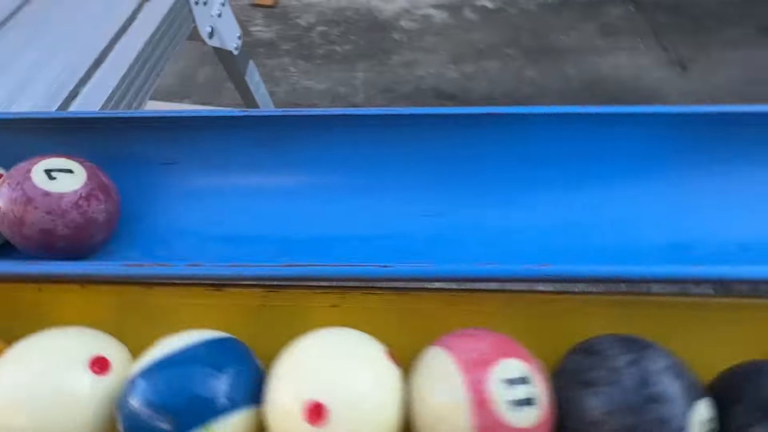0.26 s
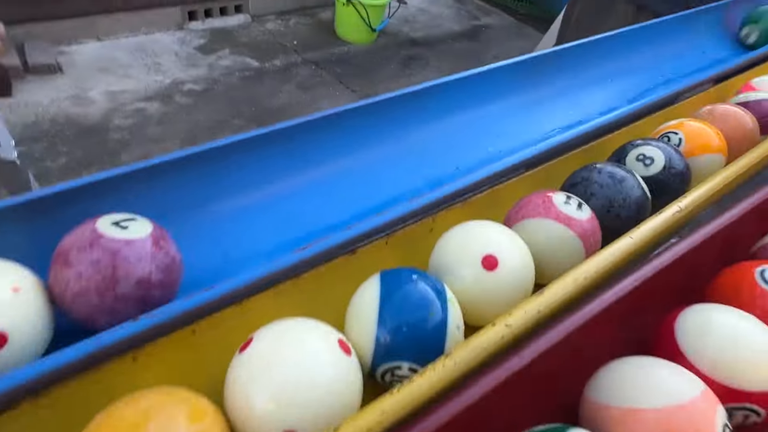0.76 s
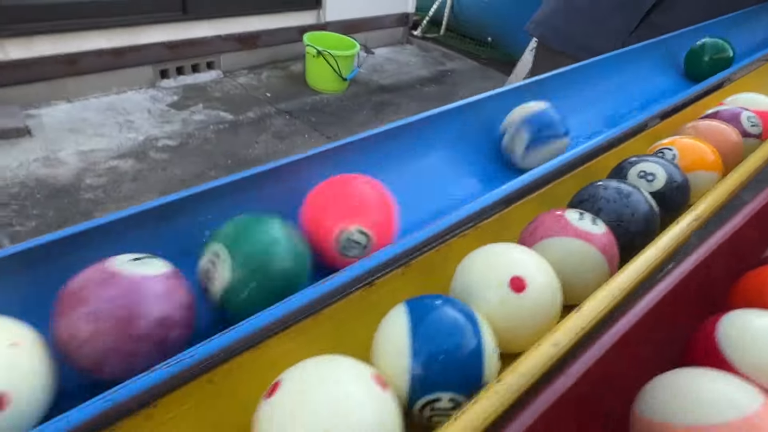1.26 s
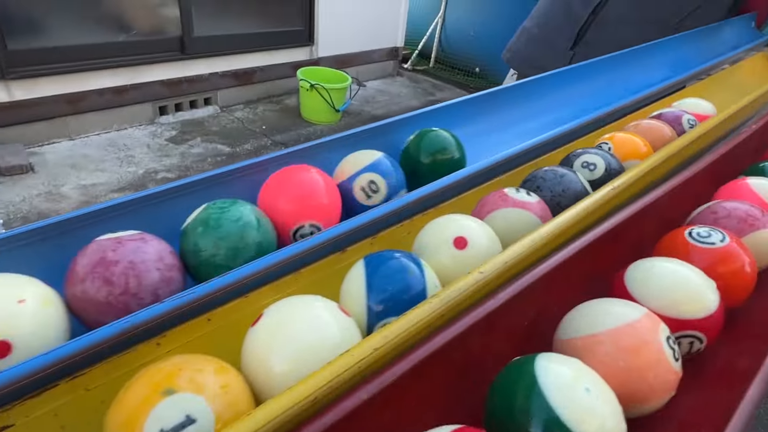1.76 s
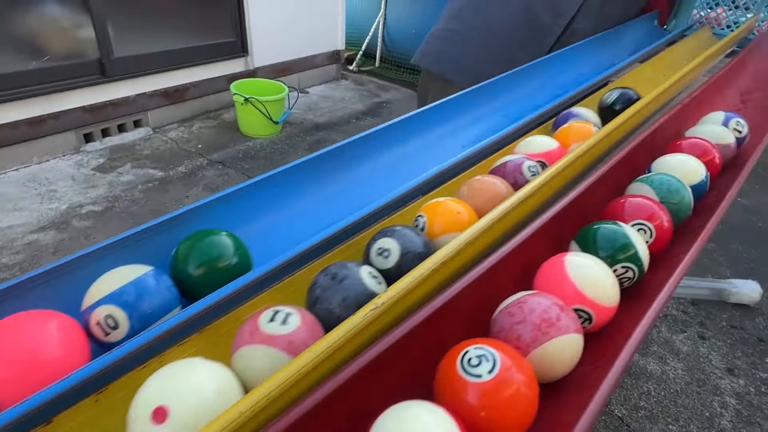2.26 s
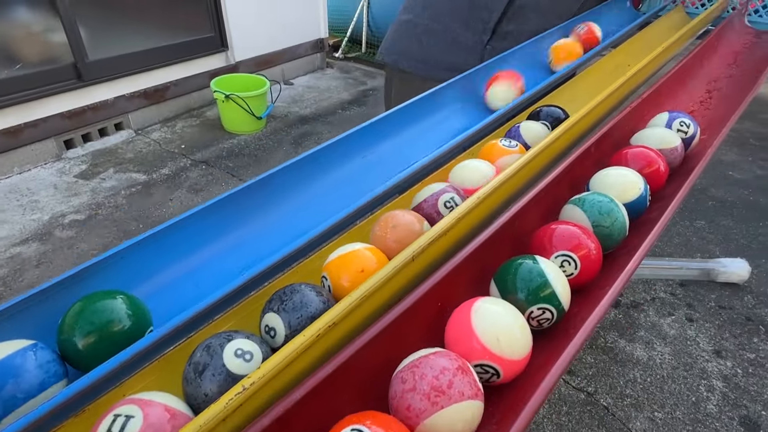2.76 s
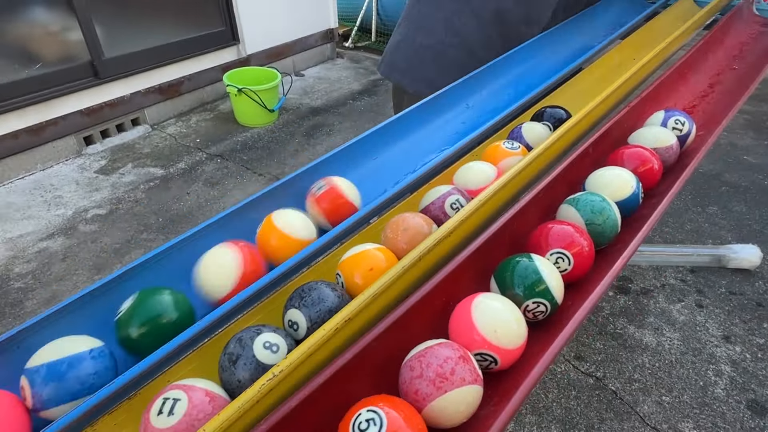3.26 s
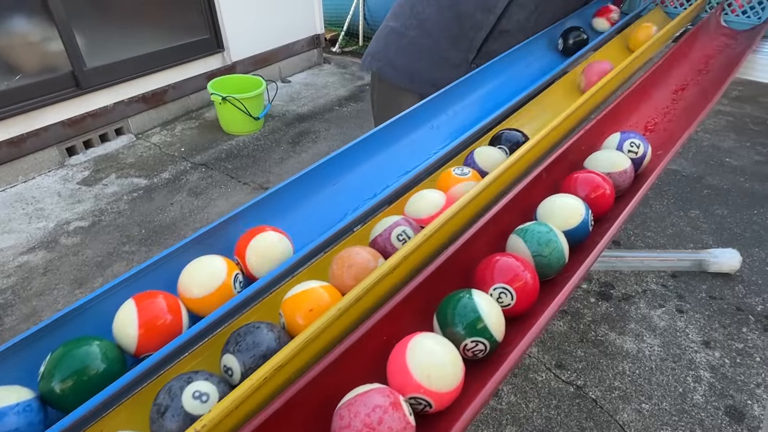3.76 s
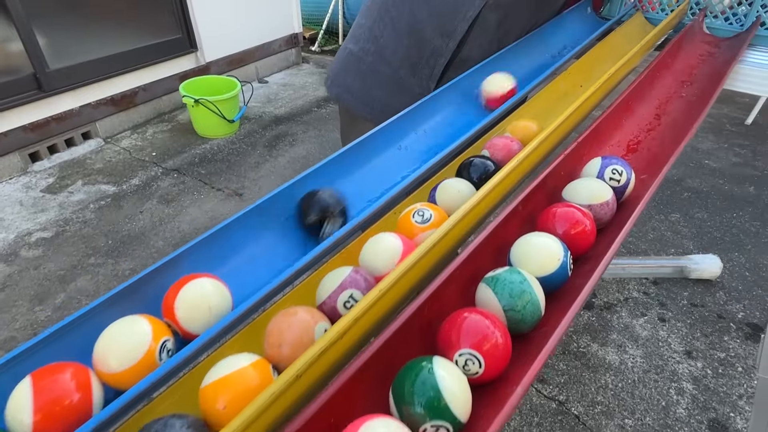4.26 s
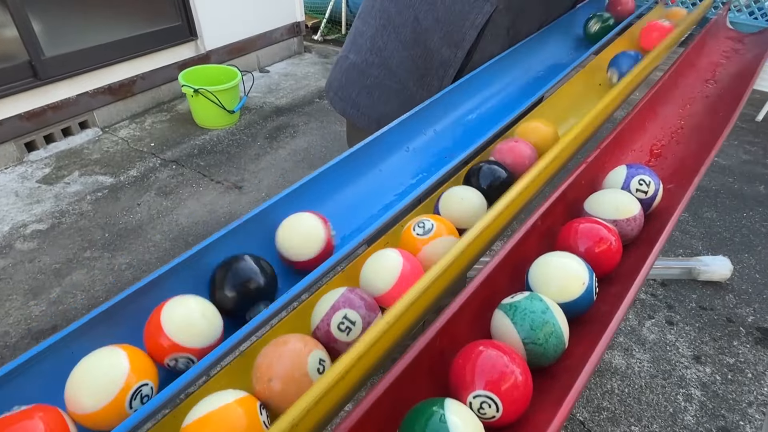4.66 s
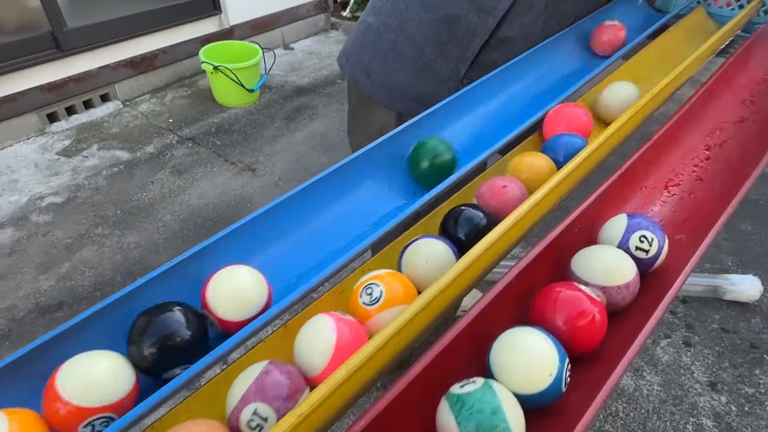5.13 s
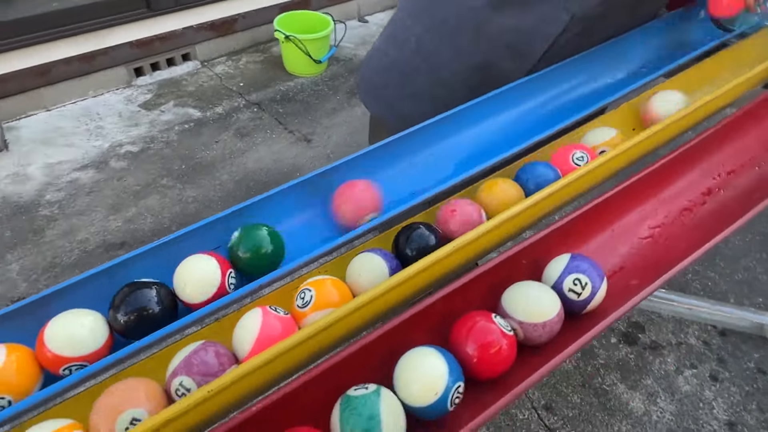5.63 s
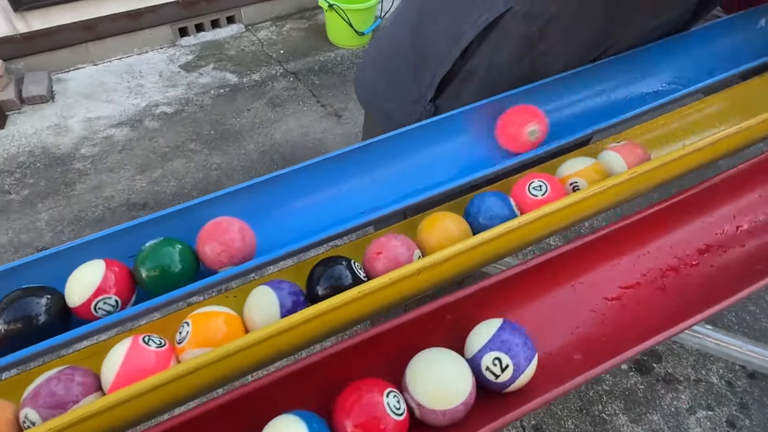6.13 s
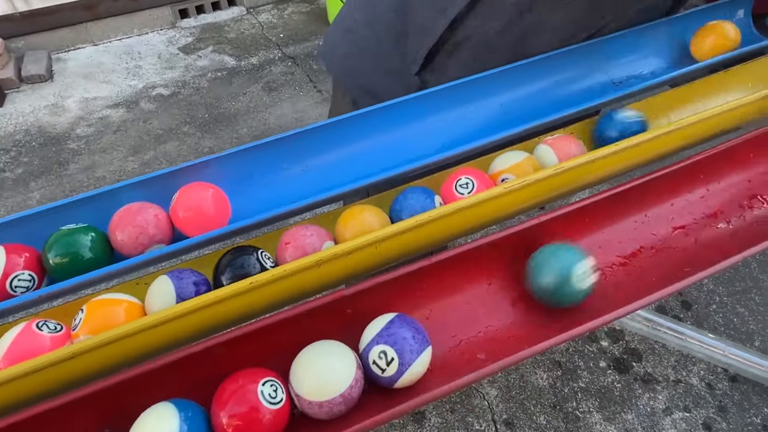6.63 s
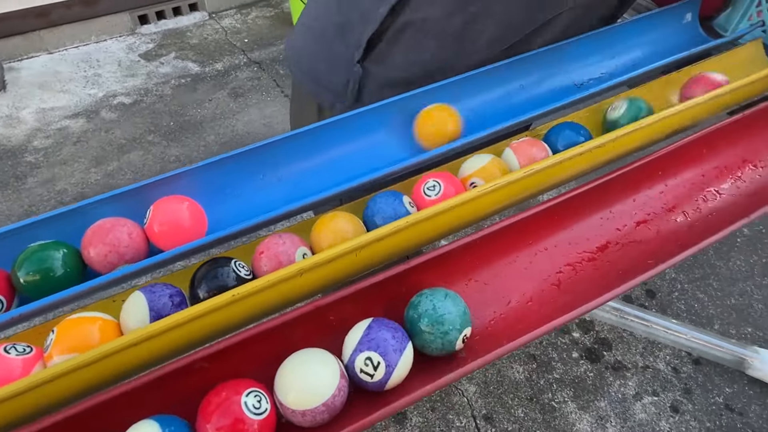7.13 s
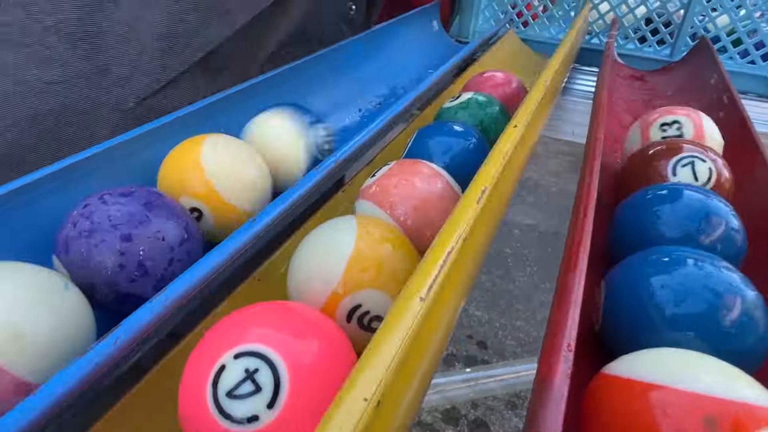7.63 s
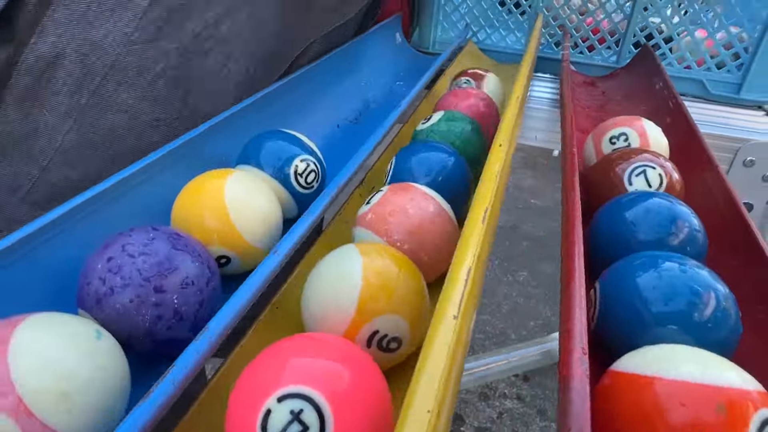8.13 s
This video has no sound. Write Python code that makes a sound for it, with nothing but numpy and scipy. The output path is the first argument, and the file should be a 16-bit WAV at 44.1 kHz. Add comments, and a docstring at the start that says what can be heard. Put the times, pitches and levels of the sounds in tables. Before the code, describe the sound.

Hard billiard balls tumble into plastic gutters, rumbling down the slope and clacking sharply against queued balls, close up in an open yard.

```python
"""A walled yard: billiard balls are tipped one after another into plastic rain gutters, heard close.
Balls land with a hollow knock, rumble down the slope and clack into the queue at the bottom.
Filtered noise gives the knocks and the rolling; short gliding sine packets with a snap give the clacks.
The yard answers the clacks with a noise tail, over faint outdoor air.
The recorder's limiter catches the loudest clacks and ducks everything briefly after them."""
import sys
import numpy as np
from scipy import signal
from scipy.fft import rfft, irfft, next_fast_len
from scipy.io import wavfile
from scipy.ndimage import uniform_filter1d, minimum_filter1d, map_coordinates

SR = 44100
rng = np.random.default_rng(int(sys.argv[2]) if len(sys.argv) > 2 else 0)


def output_pcm(signal):
    """Save a mono or channel-first signal as 16-bit PCM at the path in sys.argv[1].

    Samples are clipped to [-1, 1] before scaling.
    """
    pcm = np.clip(np.atleast_2d(signal).T, -1, 1) * 32767
    wavfile.write(sys.argv[1], SR, np.round(pcm).astype(np.int16))


N = 369999

# Ball meets ball, levels before the limiter: (t/s, ring level/dB, ring f/Hz, snap level/dB re the ring
# before a common trim, ring half-width/ms before shaping, snap treble/dB, applied in part)
CLACK_EVENTS = [(0.041, -27, 3850, -8, 0.82, -2), (0.0799, -5, 5160, 0.5, 0.27, 1),
                (0.0818, -0.5, 3430, -7, 0.43, -7), (0.129, -18.5, 3840, 1, 0.44, -3),
                (0.147, -26, 3600, -8, .8, -2), (0.243, -21, 3600, 1, 1.5, 0),
                (0.2778, -19.5, 4040, 4.5, 0.54, 0), (0.359, -9, 4020, -6, 0.66, 3),
                (0.3615, 4, 3270, -2.5, 0.34, 15), (0.371, -5, 4260, 2, 0.66, 0),
                (0.447, -15.5, 4280, 9.5, 0.68, -2), (0.7885, 0.5, 3800, 1.5, 0.5, 7),
                (1.329, -3, 4100, 1.5, 0.45, 3), (1.3403, -5, 3800, 2, 0.42, 6),
                (1.3448, -5, 4040, -4, .42, 2), (1.3487, -2.5, 3930, 1, 0.44, 7),
                (1.352, -5, 3870, -4, .6, 0), (1.3988, -6, 3500, -5, 0.5, 0),
                (1.4139, -4, 3555, -5, 0.5, 11), (1.4246, -8.5, 3600, -7, .6, 5),
                (1.438, -4.5, 3930, 2, 0.36, -6), (1.4614, -21, 3644, -1, .7, 0),
                (1.512, -24, 3730, -9, .7, -2), (1.5385, -20.5, 3820, -7, .6, -10),
                (1.551, -27, 3950, -9, .7, -2), (1.636, -26, 3900, 4, 1.0, -6),
                (1.686, -13, 3820, 0, 0.51, 0), (1.689, -14, 4100, -8, 0.51, -3),
                (1.6921, -6, 3880, -1.5, .6, -2), (1.696, -16, 4000, -5, .5, -3),
                (1.703, -16.5, 4100, -1, 0.8, -2), (1.8985, -13, 3030, -1, 0.42, 0),
                (1.9007, -4.5, 3950, 2.5, 0.7, -3), (1.965, -28.5, 3850, -13, 0.52, 0),
                (2.01, -22.5, 2960, -5, 0.4, 1), (2.1477, -23.5, 3900, -0.5, 0.43, 1),
                (2.314, 2.5, 3860, -3.5, 0.5, 0), (2.336, -4, 3800, -4, 0.76, 6),
                (2.38, -21, 3727, 1, 0.55, -7), (2.4163, -1, 4100, -3.5, 0.65, 0),
                (3.114, -4.5, 3850, -3, 0.5, 0), (3.2305, -22, 3800, -4, 1.2, -2),
                (3.248, -12, 3820, -11, 0.51, 0), (3.2643, -4.5, 3870, -4.5, 0.72, -5),
                (3.355, -12.5, 3700, -20, .8, 0), (3.362, -11, 3740, -23, .8, 0),
                (3.3769, -4, 3950, -6, 0.57, -11), (3.411, -18, 3800, -8, 1, -2),
                (3.455, -28, 3920, -8, 0.82, -2), (4.001, 0, 3900, -5, 0.75, -4),
                (4.2315, -1, 4000, -4.5, 0.6, 0), (4.4305, -3, 3970, -4, 0.7, -6),
                (4.6876, -12.5, 4150, 3, 0.67, -6), (4.83, -30, 4170, -2, 1.1, -2),
                (4.911, 1.5, 4020, -8, 0.67, 15), (4.953, -23.5, 4220, -12, .8, -3),
                (5.1608, 2.5, 4210, -9, 0.7, -4), (5.2641, 1.5, 4200, -6, 0.69, -4),
                (5.3538, -3, 3980, -0.5, 0.61, -8), (5.362, -14, 4000, -6, 0.93, -14),
                (5.7828, -8.5, 4030, -1, 0.59, 4), (5.787, -18, 4330, -8, 0.98, -3),
                (5.8071, 2, 4130, -10.5, 0.66, 2), (6.016, -39.5, 3900, -3, 0.6, 0),
                (6.44, -3.5, 4080, -1.5, 0.97, -16), (6.751, -4, 4090, -9, 0.75, 0),
                (6.804, -1.5, 3980, -2.5, 0.99, -6), (7.159, -28, 4000, -12, 0.83, 0),
                (7.2892, -5.5, 4260, -8, 0.96, 15), (7.379, -15, 4380, -3.5, 2.2, -10),
                (7.4439, -3.5, 4040, -5.5, 1, -4), (7.7375, -12.5, 3570, 5.5, 0.38, 19),
                (7.7401, -8.5, 5380, -8, 0.71, 5), (7.9419, -7.5, 5370, 0, 0.47, 10),
                (7.946, -9, 5450, -12, .75, 0)]


def amp(db):
    """Decibels to gain."""
    return 10 ** (np.asarray(db) / 20)


def unit(x):
    """Scaled to rms 1."""
    return x / np.sqrt(np.mean(x ** 2) + 1e-20)


def along(points, hz):
    """(f/Hz, value) points read on a log frequency axis."""
    f, v = np.transpose(points)
    return np.interp(np.log(hz + 1), np.log(f + 1), v)


def wobble(rate):
    """A smooth random curve, rate knots a second."""
    knots = rng.standard_normal(int(N * rate / SR) + 4)
    return map_coordinates(knots, [np.arange(N) * rate / SR])


def controls(rows):
    """One value per sample for each column after the time."""
    s, *columns = np.transpose(rows)
    return [np.interp(np.arange(N) / SR, s, c) for c in columns]


def filtered(x, response):
    """x times a complex response of frequency."""
    m = next_fast_len(x.shape[-1] + SR // 8)
    spectrum = rfft(x, m) * response(np.fft.rfftfreq(m, 1 / SR))
    return irfft(spectrum, m)[..., :x.shape[-1]]


def add(track, s, sound):
    """Mix a stereo sound into the track at time s."""
    start = max(round(s * SR), 0)
    part = track[:, start:start + sound.shape[1]]
    part += sound[:, :part.shape[1]]


def panned(db):
    """Left and right gains of mean power 1, db apart."""
    return unit(amp([[db / 2], [-db / 2]]))


def steady(x, span_s):
    """The same vibration with its slow swells evened out, rms 1."""
    power = uniform_filter1d(np.mean(x ** 2, axis=0), max(int(span_s * SR), 2))
    return unit(x / np.sqrt(np.abs(power) + 1e-20))


def pulse(spectrum, size=512):
    """The causal (minimum-phase) pulse of peak 1 that has this spectrum's shape."""
    cepstrum = irfft(np.log(amp(along(spectrum, np.fft.rfftfreq(size, 1 / SR)))))
    cepstrum[1:size // 2] *= 2
    cepstrum[size // 2:] = 0
    shape = irfft(np.exp(rfft(cepstrum)))
    return shape / np.abs(shape).max()


def air():
    """Faint steady outdoor background, independent at each microphone."""
    # Spectral shape: (f/Hz, level/dB per Hz)
    air_spectrum = [(25, 0), (60, 5), (150, 9), (500, 1.5), (1500, 0.5), (4000, -2), (6000, -12.5),
                    (12000, -12), (16000, -23)]
    noise = rng.standard_normal((2, N))
    return amp(-57) * unit(filtered(noise, lambda hz: amp(along(air_spectrum, hz))))


def yard(early_t60=0.031, late_t60=0.24, late_db=-10):
    """Ground and walls answer clacks with a dense tail, quick then slow; weaker for pitches off its band."""
    # Diffuse answer of the yard, spectral shape: (f/Hz, level/dB per Hz)
    yard_spectrum = [(300, -23), (1000, -11.5), (2000, -11), (3000, -5), (3400, 3), (3800, 5), (4250, 2.5),
                     (4800, -10.5), (5500, -23), (7000, -28), (16000, -44)]
    t = np.arange(SR // 3) / SR
    fall = amp(-60 * t / early_t60) ** 2 + amp(late_db - 60 * t / late_t60) ** 2
    fall = fall * (1 - np.exp(-t / 0.00071))
    power = np.zeros((2, N))
    for s, db, hz, _, width_ms, _ in CLACK_EVENTS:
        # wider rings carry more energy
        add(power, s, width_ms * amp(db + .5 * along(yard_spectrum, hz)) ** 2 * fall[None])
    noise = filtered(rng.standard_normal((2, N)), lambda hz: amp(along(yard_spectrum, hz)))
    return np.sqrt(power) * unit(noise * amp(2.1 * wobble(250) + 2.4 * wobble(70)))


def friction():
    """Boom, rumble, grind and hiss gains; a skid starts fast, eases as the ball spins up, ends at grip."""
    # Balls on their way down, before flicker and trims: (t/s, boom level/dB, rumble level/dB, grind level/dB)
    rolling_levels = [(0, -54, -39.5, -37.5), (0.47, -42, -32, -32.5), (0.58, -50, -46.5, -50.5),
                      (0.7, -38, -37, -53), (0.85, -47, -42.5, -51), (0.93, -41, -41, -39.5),
                      (1.05, -40, -35.5, -41), (1.17, -48, -37, -38), (1.3, -47, -36.5, -32.5),
                      (1.52, -57, -47, -47.5), (2.12, -58.5, -47, -46), (2.22, -46.5, -44.5, -48.5),
                      (2.35, -43, -37, -43), (2.58, -44, -45.5, -51), (2.75, -41.5, -41.5, -45.5),
                      (3.08, -47, -46, -45), (3.16, -54, -46, -41), (3.42, -56, -50, -51),
                      (3.7, -49.5, -41.5, -51.5), (3.95, -58, -50.5, -44), (4.15, -67, -56.5, -47.5),
                      (4.45, -50.5, -46.5, -50.5), (4.7, -52, -40, -49), (5.0, -55.5, -51.5, -49),
                      (5.35, -62, -52, -45.5), (5.55, -51, -56, -48), (5.8, -69, -62, -46.5),
                      (6.03, -63, -55, -61), (6.35, -50.5, -48, -39), (6.65, -51, -41, -50),
                      (7.1, -45, -40, -42.5), (7.3, -46.5, -43, -47.5), (7.6, -50.5, -41.5, -48),
                      (8.0, -48, -46, -48), (8.39, -48.5, -38, -39.5)]
    # A ball slides before it grips, before flicker and trims:
    # (t/s, length/s, hiss level/dB, grind level/dB re the hiss)
    skid_events = [(0.167, 0.26, -43, -4), (0.583, 0.15, -43.5, 3.5), (1.002, 0.046, -57.5, 21.5),
                   (1.187, 0.14, -39.5, 8.5), (1.26, 0.18, -45, -3), (1.603, 0.19, -52, -1),
                   (2.113, 0.095, -48, 2), (2.243, 0.26, -54.5, -8), (2.45, 0.07, -44, -7),
                   (3.163, 0.14, -44, 5), (3.28, 0.11, -42, -2.5), (3.453, 0.2, -46, -1),
                   (4.594, 0.23, -42.5, 10.5), (5.087, 0.057, -50.5, 3), (5.215, 0.11, -54, 6),
                   (5.431, 0.25, -45.5, 0), (5.556, 0.017, -42.5, 0.5), (6.293, 0.18, -66, 6),
                   (6.949, .11, -43, 8.5), (7.185, 0.018, -39.5, -4), (7.283, 0.12, -52.5, 7.5),
                   (7.643, 0.017, -42.5, 6), (7.729, 0.25, -47, 8.5), (8.153, 0.19, -52.5, -4)]
    attack_s, sag_db_per_s, release_db_per_s = 0.002, 20.5, 243
    roll_hiss_db = -19.5  # re a rolling ball's grinding
    boom_db, rumble_db, grind_db = controls(rolling_levels)
    t = np.arange(SR // 2) / SR
    skidding = np.zeros((2, N))  # rows: grinding, hiss
    for s, length, db, grinding_db in skid_events:
        fall_db = sag_db_per_s * t + release_db_per_s * np.maximum(t - length, 0)
        envelope = amp(db - fall_db) * (1 - np.exp(-t / attack_s))
        add(skidding, s, amp([[grinding_db], [0]]) * envelope)
    grind_gain = np.hypot(amp(grind_db), skidding[0])
    hiss_gain = np.hypot(amp(grind_db + roll_hiss_db), skidding[1])
    return amp(boom_db), amp(rumble_db), grind_gain, hiss_gain


def jolts(strength, rate, pitch_hz, spread, cycles, size_db):
    """Random small contacts, each a few damped cycles, as strong as the friction beneath them."""
    when, pitch, size, side = rng.random((int(rate * N / SR), 4)).T
    pitches = pitch_hz * spread ** (2 * pitch - 1)
    levels_db = size_db * (size ** 3 - 1)  # most are far below the strongest
    t = np.arange(SR // 25) / SR
    out = np.zeros((2, N))
    for at, hz, db, pan_db in zip(when * N / SR, pitches, levels_db, 6 * side):
        age = t * hz / cycles
        swell = age * np.exp(1 - age)  # rises, then dies
        gain = strength[int(at * SR)] * amp(db) * panned(pan_db)
        add(out, at, gain * swell * np.sin(2 * np.pi * hz * t))
    return out


def plastic(spectrum, grain_db, grain_rate, lead_ms, patchy_db=3.0):
    """Stereo vibration of rms 1: uneven tiny contacts excite the gutter's resonances."""
    # Wall resonances of the gutter: (f/Hz, width/Hz, lift/dB)
    resonances = [(159, 7.8, 2), (269, 32, 2), (367, 69, 2.5), (570, 130, 3), (740, 52, 0), (1060, 39, 3),
                  (1194, 62, 0.5), (1635, 215, 5), (2390, 28, 7.5), (4060, 98, 1.5), (5340, 62, 0.5),
                  (11500, 460, 2)]
    # Likeness of the two microphones: (f/Hz, likeness/0-1)
    likeness = [(40, 0.19), (200, 0.41), (600, 0.48), (1500, 1), (4000, 0.169), (12000, 0.15)]
    drive = rng.standard_normal((2, N)) * amp(grain_db * wobble(grain_rate))
    # as a ball moves along the gutter, it passes nodes and crests of the modes: random patches
    hz, _, z = signal.stft(drive, SR, nperseg=1024)
    field = uniform_filter1d(rng.standard_normal(z.shape[1:]), 3, 0)
    field = unit(uniform_filter1d(field, 5, 1))
    patches = amp(patchy_db * field / (1 + hz[:, None] / 9000))
    drive = signal.istft(z * patches, SR, nperseg=1024)[1][:, :N]

    def response(hz):
        lift = sum(db / (1 + (2 * (hz - centre) / width) ** 2) for centre, width, db in resonances)
        turn = np.arccos(np.clip(along(likeness, hz), -1, 1)) / 2
        return amp(along(spectrum, hz) + lift) * np.array([np.cos(turn), np.sin(turn)])

    mid, side = filtered(drive, response)
    # the right microphone hears it lead_ms later
    right = filtered(mid - side, lambda hz: np.exp(-2j * np.pi * hz * lead_ms / 1000))
    return unit(np.array([mid + side, right]))


def rolling():
    """Balls make the gutter boom, rumble on its floor, grind over dust and hiss where they skid."""
    # The gutter under a rolling ball, before its resonances, all four: (f/Hz, level/dB per Hz)
    boom_spectrum = [(20, -38), (40, -16), (65, -12.5), (90, -1.5), (115, 1.5), (150, -2), (250, -18),
                     (1000, -80)]
    rumble_spectrum = [(20, -60), (90, -28), (140, -1.5), (200, 2), (300, -0.5), (500, -8), (700, -10.5),
                       (1200, -36), (3000, -63)]
    grind_spectrum = [(200, -40), (450, 0.5), (650, -2.5), (900, -3), (1150, -0.5), (1500, -3.5),
                      (2100, -4), (3000, -11), (4000, -12), (5000, -19), (8000, -59), (16000, -82)]
    hiss_spectrum = [(800, -14), (2500, 6.5), (4000, 8), (5500, 1.5), (7000, -1), (9000, -4), (10800, -3),
                     (13000, -8), (15500, -10.5), (17000, -28)]
    boom_gain, rumble_gain, grind_gain, hiss_gain = friction()
    bumps = wobble(35)  # shared flicker, its depth and trim in dB set per layer
    boom = steady(plastic(boom_spectrum, grain_db=3.0, grain_rate=50, lead_ms=.02), span_s=0.14)
    boom = boom_gain * amp(1.8 * bumps + .5) * boom
    rumble = steady(plastic(rumble_spectrum, grain_db=3.5, grain_rate=70, lead_ms=0.0206), span_s=0.092)
    rumble = rumble_gain * amp(1.74 * bumps + 0.55) * rumble
    grind = plastic(grind_spectrum, grain_db=2.5, grain_rate=200, lead_ms=0.22)
    grind = grind_gain * amp(1.43 * bumps - 2.3) * grind
    hiss = plastic(hiss_spectrum, grain_db=2.5, grain_rate=230, lead_ms=0.1)
    hiss = hiss_gain * amp(3.7 * bumps + 6.0) * hiss
    return (boom + rumble) * panned(0.68) + grind * panned(4.6) + hiss * panned(0.75)


def blows(vibration, part, hold_s, steady_s, t60, rattle_t60, attack, mode_db, mode_width,
          rattle_mode_db, hop_db, contact_hz=10700):
    """One part of every knock: a solid blow, held by its length, then the ball chatters itself to rest."""
    # Balls drop or bump on plastic, before each part's trim: (t/s, wall level/dB, thud level/dB re wall,
    # crack level/dB re wall, rattle level/dB re blow, length re a usual blow, flexing f/Hz, wall f/Hz, L-R/dB)
    knock_events = [(0.1721, -12, -6.5, -15, -20, 0.64, 300, 1610, 0.5),
                    (0.181, -21, 4, -15, -16, 1.26, 101, 1140, 1.5),
                    (0.206, -22.5, 4, -16, -14.5, 0.61, 260, 1150, 2),
                    (0.2503, -17, 0.5, -12, -15.5, 1.05, 125, 1050, 2),
                    (0.283, -35.5, 10.5, -13, -18, 1.1, 105, 1100, 1.5),
                    (0.319, -31, -23, -3, -2.5, 1.1, 201, 3070, 1),
                    (0.4581, -32, -14, 3, -38, 0.94, 261, 2230, 3),
                    (0.6174, -14.5, -2, -14.5, -7.5, 1.36, 257, 930, 5),
                    (0.657, -22.5, -5, -13, -18, 1.4, 300, 800, 6),
                    (0.975, -47.5, 12, -25, -14, 1.2, 140, 900, 5),
                    (1.08, -43, 7, -27, -14, 1.3, 120, 900, 7),
                    (1.2896, -15.5, -1, -21, -12, 0.77, 516, 710, 4),
                    (1.313, -27.5, 3, -11, -12, 0.7, 400, 900, 3),
                    (1.378, -25.5, 1.5, -10, -4.5, 0.69, 226, 960, 5),
                    (1.596, -14.5, -22, -16, -17, 0.67, 318, 1920, 5),
                    (1.622, -29, -6, -8, -19, 0.61, 318, 1500, 5),
                    (1.741, -19.5, -2.5, -13, -8, 0.96, 447, 610, 5.5),
                    (2.4625, -20.5, -3.5, -12.5, -6.5, 1.55, 245, 1490, 5.5),
                    (2.631, -23.5, -2, -15.5, -2.5, 1.8, 171.5, 1370, 3.5),
                    (3.488, -25, -2, -12.5, -13, 1.95, 330, 746, 3.5),
                    (3.5576, -23, -2, -12, -6.5, 1.26, 473, 1000, 5),
                    (3.572, -17, -2, -8, -11, 1.1, 455, 2350, 3),
                    (3.588, -26.5, -9, 2, -13, 1, 300, 2300, 0),
                    (3.626, -31.5, -7, -16, -18, 1.1, 300, 900, 13),
                    (4.542, -30.5, -28, 1.5, -25, 1, 167, 2040, 3),
                    (4.5972, -19.5, -7.5, -10.5, -29, 1.9, 382, 1390, 6.5),
                    (4.6771, -29.5, -16, -12, 6.5, 1.5, 430, 1510, 4),
                    (5.2148, -33, -23, -5.5, -6, 1, 200, 2370, 0),
                    (5.441, -23.5, -8.5, -8, -7, 1.1, 380, 840, 3.5),
                    (5.459, -29, -5, -19, -4.5, 0.52, 350, 700, 1),
                    (5.471, -29, -7, -13, -7, 0.51, 300, 1100, 5),
                    (5.494, -29.5, -8, -13.5, -2, 1, 296, 806, 2),
                    (5.567, -33.5, -5.5, 0, -12.5, 0.71, 350, 700, 1),
                    (5.773, -23.5, -10, -10.5, -8.5, 0.96, 477, 1200, 1),
                    (6.0859, -26.5, -26, 1.5, -29, 1, 298, 1750, 1),
                    (6.1043, -20, -8, -11.5, -11.5, 0.87, 190, 1630, 2),
                    (6.1421, -31.5, -24, 8, -26, 0.97, 162, 1960, -0.5),
                    (6.186, -44, -30, 5, -13, 1.1, 210, 2300, -1),
                    (6.2286, -45.5, -35, 7.5, -15.5, 1, 172, 2300, 2),
                    (6.2677, -28, -30, 4.5, -23.5, 0.93, 403, 1900, 5),
                    (6.2942, -23.5, -1, -6.5, -9.5, 1.17, 292, 714, 2.5),
                    (6.3473, -30.5, 4.5, -8, -12.5, 0.74, 186, 900, 2),
                    (6.372, -35.5, -4, -2, -20, .7, 250, 1100, 1),
                    (6.449, -24, -5.5, -13, -6.5, 1.1, 277, 1030, 2),
                    (6.5266, -29, -8, -8.5, -10.5, 0.8, 380, 1060, 3),
                    (6.8588, -40, -31, -2.5, -6, 1.3, 200, 2300, 0),
                    (6.952, -29, -1, -7, -6, 0.8, 358, 1290, 4),
                    (7.016, -27.5, -4.5, -14, -14, 0.78, 345, 1330, 1),
                    (7.148, -37, 6, -17, -3.5, 1.25, 197, 1290, 5),
                    (7.8116, -31, -30, 9.5, -30, 0.92, 479, 1310, 8),
                    (7.8476, -17.5, -4.5, -6.5, -17, 1.2, 440, 860, 7),
                    (7.891, -26.5, -11, -11, -14, .8, 400, 804, 6),
                    (7.922, -31.5, -4, -20, -0.5, 1.5, 400, 710, 0.5),
                    (8.014, -38, 9.5, -26, -12, 1.3, 456, 745, -1),
                    (8.056, -36, -9, -26, -13, 0.3, 397, 2190, 5),
                    (8.067, -37, 1, -20, -14, 0.86, 420, 890, 2),
                    (8.138, -39.5, 13, -21, -21, 0.56, 423, 650, -1)]
    t = np.arange(SR // 3) / SR
    out = np.zeros((2, N))
    for s, wall_db, thud_db, crack_db, rattle_db, length, flex_hz, wall_hz, pan_db in knock_events:
        choices = {"thud": (thud_db, flex_hz), "knock": (0, wall_hz), "crack": (crack_db, contact_hz)}
        part_db, centre = choices[part]

        def ring(start, lift_db):
            # the landing spot decides which of the gutter's modes is emphasised
            mode = lambda hz: 1 / (1 + ((hz / centre - 1) / mode_width) ** 2)
            return unit(filtered(vibration[:, start:start + len(t)], lambda hz: amp(lift_db * mode(hz))))

        first, second = rng.integers(N - len(t), size=2)
        fall = amp(-60 * np.maximum(t / length - hold_s, 0) / t60)
        blow = unit(fall * steady(ring(first, mode_db), steady_s)) * np.sqrt(np.mean(fall ** 2))
        rattle = amp(rattle_db - 60 * t / rattle_t60) * steady(ring(second, rattle_mode_db), 4 * steady_s)
        # the ball bounces unevenly
        hops = unit(amp(hop_db * np.interp(t * 160, np.arange(200), rng.standard_normal(200))))
        onset = 1 - np.exp(-t / (attack * length))
        add(out, s, amp(wall_db + part_db) * panned(pan_db) * onset * (blow + hops * rattle))
    return out


def knocks():
    """A landing ball flexes the gutter, rings its wall and cracks at the contact spot."""
    # Gutter flexing, wall ringing and contact spot, before resonances, all three: (f/Hz, level/dB per Hz)
    thud_spectrum = [(25, -30), (60, -41), (110, -7.5), (160, 3), (260, 1.5), (500, -2), (700, -6),
                     (1200, -14.5), (3000, -75)]
    knock_spectrum = [(200, -59), (450, -13.5), (650, -3.5), (900, -10), (1150, 0), (1450, -6.5),
                      (2000, -4), (2800, -5), (4000, -7.5), (5200, -16.5), (8000, -29), (16000, -77)]
    crack_spectrum = [(800, -37), (2500, -1.5), (4000, 4.5), (5400, -3), (6500, -1), (8000, -3.5),
                      (9300, -1.5), (10600, -2), (13000, -7.5), (15500, -9.5), (17000, -27)]
    low = blows(plastic(thud_spectrum, grain_db=3.5, grain_rate=66, lead_ms=0.049), "thud",
                hold_s=0.0049, steady_s=.01, t60=0.059, rattle_t60=0.4, attack=0.0052,
                mode_db=8, mode_width=0.27, rattle_mode_db=5, hop_db=3.0)
    body = blows(plastic(knock_spectrum, grain_db=2.5, grain_rate=230, lead_ms=0.19), "knock",
                 hold_s=0.0023, steady_s=0.00376, t60=0.058, rattle_t60=0.26, attack=0.00057,
                 mode_db=12.5, mode_width=0.33, rattle_mode_db=6.5, hop_db=3.0)
    top = blows(plastic(crack_spectrum, grain_db=-0.5, grain_rate=570, lead_ms=0.168), "crack",
                hold_s=0.00017, steady_s=0.00335, t60=0.022, rattle_t60=0.23, attack=0.00016,
                mode_db=9.5, mode_width=1.0, rattle_mode_db=-5.0, hop_db=3.5)
    return amp(2.13) * low + amp(2.5) * body + amp(7.5) * top


def clacks(lead_widths=2.644, snap_db=2.0, port_delay=0.00024, rise=0.87, linger=0.87,
           spray_db=-20, spray_t60=0.013, glide=0.016):
    """The contact snaps first; then the gutter, a curved reflector, returns it as a short swelling ring."""
    # The brief push of two hard balls, before each clack's treble: (f/Hz, level/dB)
    snap_spectrum = [(100, -56), (500, -7), (1000, -2), (1600, 7), (2600, 8.5), (3800, 9.5), (4900, 5),
                     (6200, -7), (10000, -22.5), (13000, -18.5), (17000, -84)]
    # Returns from gutters, ground and house wall, before random scatter: (delay t/s, level/dB)
    returns = [(.0038, -8.5), (.0072, -20.5), (0.048, -32)]
    # The end of the queue as the moving microphones hear it: (t/s, L-R/dB)
    queue_side = [(0.1, -1), (0.8, 6), (2.4, 6.5), (4.4, 6), (5.8, 6), (6.5, 3.5), (7.45, 2), (7.75, 8.5)]
    stray_db, stray_latest_s, stray_fall_db_per_s = -27, .075, 120  # tiny rebounds along the queue
    before = .008  # s of lead-in for the swell
    out = np.zeros((2, N))
    t = np.arange(SR // 10) / SR
    u = np.array([t, t - port_delay]) - before  # the left microphone hears it first

    def swell(x):
        return np.where(x < 0, np.exp(-.5 * (x / rise) ** 2), 1 / np.cosh(np.clip(x / linger, 0, 20)))

    for s, db, hz, contact_db, width_ms, treble_db in CLACK_EVENTS:
        width = width_ms / 1000
        phase = 2 * np.pi * rng.random()
        chance = rng.standard_normal((len(returns), 4))

        def packet(v):
            # the pitch sinks a little as the ring passes
            bent = v - glide * np.hypot(v, 2 * width)
            return swell(v / width) * np.sin(phase + 2 * np.pi * hz * bent)

        ring = packet(u)
        for (delay, echo_db), (late, strength, left, right) in zip(returns, chance):
            arrival = delay + 0.000385 * late + 0.00022 * np.array([[left], [right]])
            ring = ring + amp(echo_db + strength) * packet(u - arrival)
        for when, strength in zip(stray_latest_s * rng.random(size=5), rng.standard_normal(size=5)):
            stray_gain = amp(stray_db - stray_fall_db_per_s * when + 2.1 * strength)
            ring = ring + stray_gain * packet(u - when)
        gain = amp(db) * panned(np.interp(s, *np.transpose(queue_side)))
        add(out, s - before, gain * ring)

        # the wider the ring, the earlier its snap; neighbouring balls scatter the snap into a short spray
        tilt = [(4000, 0.41), (7500, 0.59)]  # (f/Hz, share of the treble setting)
        shape = pulse([(f, level + treble_db * along(tilt, f)) for f, level in snap_spectrum])
        spray = amp(spray_db - 60 * t / spray_t60) * rng.standard_normal((2, len(t)))
        spray[0, 0] = spray[1, round(port_delay * SR)] = 1
        snap = signal.fftconvolve(spray, shape[None], axes=1)
        add(out, s - lead_widths * width, gain * amp(contact_db + snap_db) * snap)
    return out


def scene():
    """Clacks with their echo, over knocks, rolling and the outdoor background."""
    grind_gain, hiss_gain = friction()[2:]
    # balls hop over grit
    bumps = jolts(grind_gain, rate=150, pitch_hz=1085, spread=2.05, cycles=1.42, size_db=18.5)
    # jostling balls nudge each other
    ticks = jolts(hiss_gain, rate=73, pitch_hz=3750, spread=1.05, cycles=2.24, size_db=19.0)
    # grains crack under a ball
    grit = jolts(hiss_gain, rate=32, pitch_hz=7500, spread=1.7, cycles=.7, size_db=12.0)
    contacts = amp(6.0) * bumps + amp(18.5) * ticks + amp(10) * grit
    echo = amp(-18.0) * panned(2.7) * yard()
    return clacks() + echo + knocks() + rolling() + contacts + air()


def limiter(x, ceiling=0.96, hold_s=0.0928, ahead_s=0.0019):
    """Gain drops just before a peak, is held, then returns."""
    need = np.minimum(1, ceiling / (np.abs(x).max(0) + 1e-9))
    hold, ahead = int(hold_s * SR), int(ahead_s * SR)
    held = minimum_filter1d(need, hold, origin=hold // 2 - ahead)
    return x * uniform_filter1d(held, ahead)


def record(dry, low_cut_hz=55, top_hz=16300):
    """The recorder thins the deep bass, limits the peaks and cuts steeply above its band."""
    thinned = signal.sosfilt(signal.butter(2, low_cut_hz, "highpass", fs=SR, output="sos"), dry)
    return filtered(limiter(thinned), lambda hz: 1 / (1 + (hz / top_hz) ** 120))


dry = scene()
out = record(dry)
output_pcm(out)
```